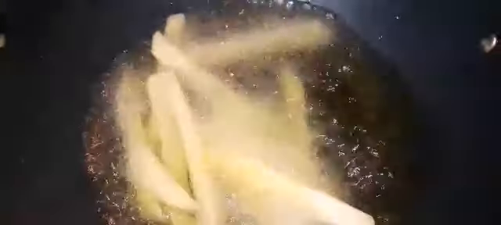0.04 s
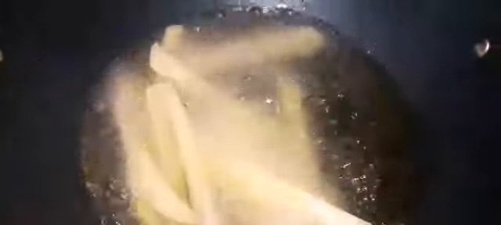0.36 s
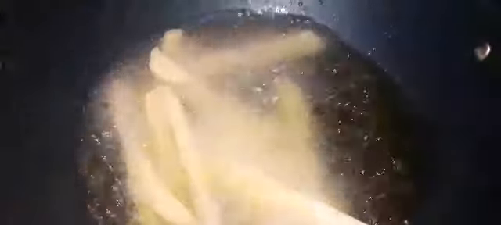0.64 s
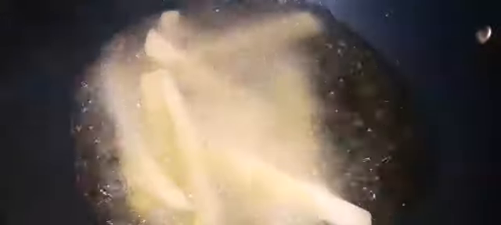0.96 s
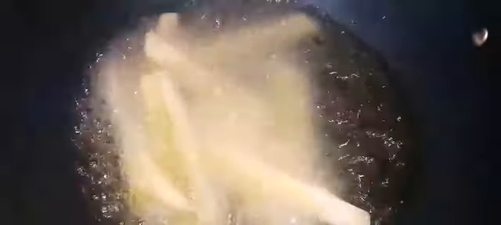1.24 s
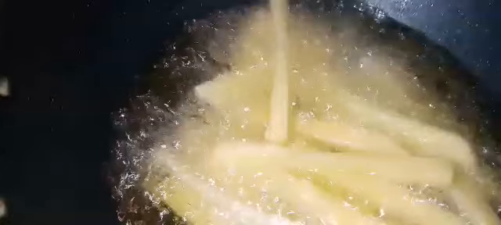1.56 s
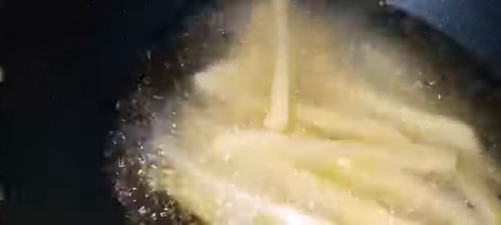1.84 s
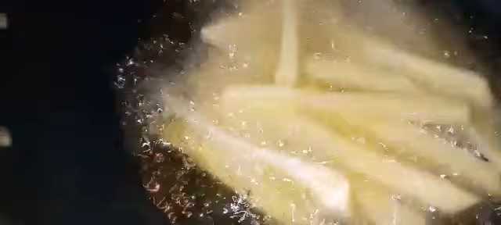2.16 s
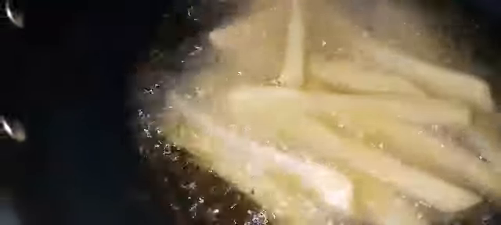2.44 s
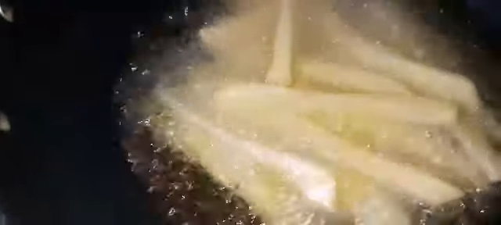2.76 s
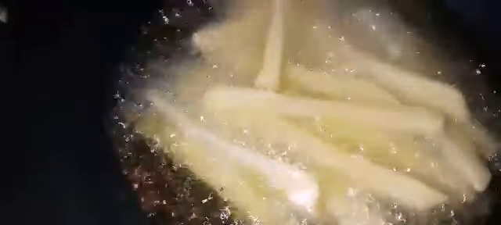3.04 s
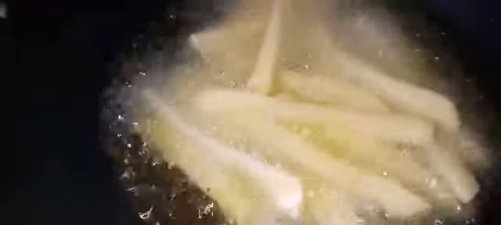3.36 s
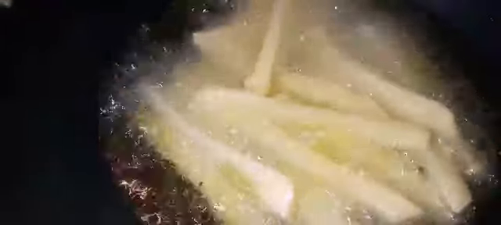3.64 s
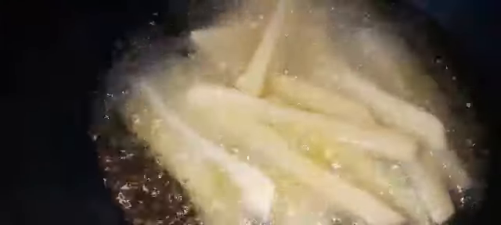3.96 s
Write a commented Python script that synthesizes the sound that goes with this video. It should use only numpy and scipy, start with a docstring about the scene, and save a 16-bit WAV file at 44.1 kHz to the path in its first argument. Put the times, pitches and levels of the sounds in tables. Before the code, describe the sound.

Potato sticks sizzle and crackle in a pan of hot oil, with small pops.

```python
"""A kitchen, close above a pan of hot oil in which potato sticks fry. Countless steam bubbles burst and ring as
damped resonators, summing to a low crackle and a high fizz. Coarsely spitting oil is heard first; at 1.28 s the
level dips briefly and the scene changes to a fine sizzle that swells and settles. Large bubbles pop, droplets
snap and the pan is knocked softly, over a faint boiling rumble and mains hum. A limiter holds the peaks."""
import sys
import numpy as np
from scipy import signal
from scipy.fft import rfft, irfft
from scipy.io import wavfile
from scipy.ndimage import uniform_filter1d, minimum_filter1d

SR = 44100
rng = np.random.default_rng(int(sys.argv[2]) if len(sys.argv) > 2 else 0)


def to_wav(s):
    """Save 16-bit WAV."""
    ch = np.atleast_2d(s).T  # columns
    pcm = np.round(np.clip(ch, -1, 1) * 32767)  # PCM
    wavfile.write(sys.argv[1], SR, pcm.astype(np.int16))


N = 176400


# Course of the spitting: time_s, crackle_db, fizz_db
SPITTING_LEVELS = [(0, -26.5, -20), (.06, -24.5, -20), (.4, -26.5, -22), (.6, -28, -22), (.67, -29, -26),
                   (.78, -29, -22), (.98, -27.5, -22), (1.03, -30.5, -27.5), (1.1, -32, -24.5),
                   (1.28, -35.5, -28.5)]
# Spectral envelopes of its two bands: frequency_hz, gain_db
COARSE_CRACKLE_SPECTRUM = [(76, -42), (200, -15), (502, -14.5), (610, -8), (771, -10.5), (1250, -3.5),
                           (1640, -7), (2240, -0.5), (2900, -12), (3770, -23), (6380, -120)]
COARSE_FIZZ_SPECTRUM = [(1590, -37), (2700, -2), (3010, -10.5), (3300, 1), (4180, -2), (4620, 0),
                        (6070, -13.5), (7480, -22), (8040, -21.5), (9080, -22.5), (10900, -24.5),
                        (12800, -26.5), (15000, -65)]

def spitting():
    """Shot noise: wet potato in hot oil sheds fewer, larger bubbles, whose uneven bursts sound coarse."""
    crackle = swarm(153, 3160, per_s=4200, spread_db=2.5, cycles=6.1, pitches=36)
    fizz = swarm(2210, 14700, per_s=15000, spread_db=2.0, cycles=12.7, pitches=56)
    crackle, fizz = colour(crackle, COARSE_CRACKLE_SPECTRUM), colour(fizz, COARSE_FIZZ_SPECTRUM)
    return frying(SPITTING_LEVELS, crackle, fizz, surge_db=1.3, surge_per_s=70)


# Course of the sizzle: time_s, crackle_db, fizz_db
SIZZLING_LEVELS = [(1.29, -37, -25.5), (1.4, -38, -21), (1.62, -36, -23), (1.8, -36, -21),
                   (1.88, -33, -19.5), (2.25, -33, -20.5), (2.55, -32.5, -22), (2.75, -33, -25.5),
                   (3.0, -35.5, -27.5), (3.55, -34, -29), (4.0, -35.5, -31)]
# Spectral envelopes of its two bands: frequency_hz, gain_db
FINE_CRACKLE_SPECTRUM = [(76, -32.5), (130, -14), (178, -22), (529, -10.5), (1030, -9), (1530, -6),
                         (2650, -2), (2900, 0), (3770, -16), (6380, -120)]
FINE_FIZZ_SPECTRUM = [(1590, -42), (2700, -8.5), (3250, -0.5), (5260, -3), (7220, -17.5), (8040, -24.5),
                      (8510, -21.5), (9140, -21.5), (10300, -19), (11500, -21.5), (12800, -30),
                      (13800, -76), (15000, -72)]

def sizzling():
    """Dense shot noise: the tiny bubbles of foaming oil overlap into a smoother hiss."""
    crackle = swarm(137, 3090, per_s=6000, spread_db=2.0, cycles=3.3, pitches=36)
    fizz = swarm(2404, 14260, per_s=30000, spread_db=1.0, cycles=13, pitches=56)
    crackle, fizz = colour(crackle, FINE_CRACKLE_SPECTRUM), colour(fizz, FINE_FIZZ_SPECTRUM)
    return frying(SIZZLING_LEVELS, crackle, fizz, surge_db=0.54, surge_per_s=60)


def bubble(hz, t60_s, rise_s=0.00024, glide_per_s=2.9):
    """Damped resonance: a bubble rings briefly, its pitch rising as it opens."""
    t = seconds(.05)
    phase = 2 * np.pi * hz * t * (1 + glide_per_s * t / 2)
    return np.sin(phase) * undb(-60 * t / t60_s) * (1 - np.exp(-t / rise_s))


def swarm(lo_hz, hi_hz, per_s, spread_db, cycles, pitches):
    """Superposition: bubbles burst at random with power-law strengths, many weak and a few strong."""
    out, bursts_per_pitch = np.zeros(N), int(per_s * N / SR / pitches) + 1
    for hz in np.linspace(lo_hz, hi_hz, pitches):
        pitch_rng = np.random.default_rng(rng.integers(1 << 30))
        when, chance, sign = pitch_rng.random((bursts_per_pitch, 3)).T
        strengths = undb(spread_db * -np.log(np.maximum(chance, .004)))
        bursts = np.bincount((when * N).astype(int), strengths * np.sign(sign - .5), N)
        ring = unit_rms(bubble(hz, t60_s=min(cycles / hz, .02))[:1024])
        out += signal.oaconvolve(bursts, ring)[:N]
    return unit_rms(out)


def frying(levels, crackle, fizz, surge_db, surge_per_s):
    """Amplitude modulation: crackle and fizz surge together as steam escapes; louder fizz is brighter."""
    t = np.arange(N) / SR
    time_s, crackle_db, fizz_db = np.array(levels).T
    surge = undb(surge_db * wander(surge_per_s))
    crackle = unit_rms(butterworth(pan_modes(crackle), hz=2674, kind="low", order=14))
    fizz = unit_rms(butterworth(pan_modes(fizz), hz=2928, kind="high", order=16))
    fizz_course_db = np.interp(t, time_s, fizz_db)
    top_hiss = fizz - below(fizz, hz=8100)
    brightening_db = 0.17 * (fizz_course_db - fizz_db.mean())
    fizz = fizz + top_hiss * (undb(brightening_db) - 1)
    return (crackle * undb(np.interp(t, time_s, crackle_db)) + fizz * undb(fizz_course_db)) * surge


# Resonances of the pan: frequency_hz, bandwidth_hz, gain_db
PAN_MODES = [(420, 6.1, -1), (625, 36, -16.5), (1284, 53, -11), (1570, 37, -10), (3280, 130, -21)]

def pan_modes(x):
    """Forced resonance: the pan adds a narrow band of the frying at each of its modes."""
    return x + sum(undb(db) * signal.lfilter(*signal.iirpeak(hz, hz / width_hz, SR), x)
                   for hz, width_hz, db in PAN_MODES)


# Courses of the bass and of the hollow between crackle and fizz: time_s, gain_db
BASS_GAINS = [(1.28, -10), (1.33, -20), (1.75, -13), (1.95, 0), (2.5, -1), (3.5, 0)]
HOLLOW_GAINS = [(.4, 4.5), (1.0, 4), (1.5, -0.5), (2.2, 3.5), (2.8, -1.5), (3.2, -1.5), (4.0, -4)]

def shifting_timbre(oil):
    """Time-varying filtering: the bass is thin until about 2 s; the hollow deepens as the oil settles."""
    oil = ride(oil, below(oil, hz=453), BASS_GAINS)
    hollow_band = signal.butter(2, (2520, 3070), "band", fs=SR, output="sos")
    return ride(oil, signal.sosfiltfilt(hollow_band, oil), HOLLOW_GAINS)


# Large bubbles: start_s, pitch_hz, level_db, t60_s
LARGE_BUBBLES = [(0.0203, 4210, -13, .007), (0.037, 3600, -5, 0.0056), (0.046, 3050, -12, 0.0041),
                 (0.0914, 4330, -10, 0.0063), (0.1148, 2230, -8, .006), (.1498, 3740, -7, 0.0077),
                 (0.1903, 880, -11, 0.01), (0.1968, 2800, -3.5, 0.0044), (.242, 4440, -7, 0.0079),
                 (.271, 1780, -7.5, 0.01), (.2998, 4730, -6.5, .006), (.3104, 2250, 1.5, 0.0063),
                 (0.3682, 2880, -7.5, .005), (0.387, 1360, -11.5, 0.013), (.3893, 5600, -7.5, 0.0071),
                 (0.4063, 4040, -5, .006), (.42, 2460, -5, .007), (.427, 2370, -7, 0.0064),
                 (.4655, 5100, -6, 0.0062), (0.5375, 3380, -7, 0.0071), (0.5427, 2170, -8.5, 0.008),
                 (.595, 2690, -7, 0.0043), (.6114, 3520, -8.5, 0.0079), (.635, 466, -21, 0.036),
                 (0.675, 3130, -7.5, 0.0067), (0.752, 3410, -6.5, .008), (0.815, 4600, -5, 0.0088),
                 (0.8496, 3310, -4, 0.013), (0.963, 2370, -7, 0.0066), (0.9743, 4600, -11, .007),
                 (1.0464, 3350, -9, 0.0074), (1.0528, 3330, 1.5, 0.0069), (1.0947, 4490, -6, .0035),
                 (1.1394, 3250, -4.5, 0.0065), (1.1613, 5700, -10.5, 0.0031), (1.1864, 2270, -8.5, 0.017),
                 (1.241, 3200, -5.5, 0.013), (1.2677, 4360, -8.5, .007), (1.403, 3170, -7.5, 0.011),
                 (1.4656, 3500, -6, 0.0041), (1.4944, 3200, -8, .004), (1.7491, 3530, -9.5, .004),
                 (1.8584, 3750, -9, 0.0026), (2.245, 1500, -13, 0.0029), (2.327, 2400, -14, .006),
                 (2.7116, 3870, -17, .005), (2.9105, 2460, -15, 0.0039), (3.1254, 3590, -2, 0.0033)]

def pops(gain_db=-1, click_db=-29, spray_db=-15, spray_decay_s=0.0015):
    """Impulse excitation: a large bubble breaks with a click and a short splash, then rings freely."""
    out = np.zeros(N)
    for start_s, pitch_hz, level_db, t60_s in LARGE_BUBBLES:
        ring = unit_peak(bubble(pitch_hz, t60_s))
        t = np.arange(len(ring)) / SR
        spray = noise(len(t), BURST_SPECTRUM) * np.exp(-t / spray_decay_s)
        pop = ring + undb(click_db) * click(len(t)) + undb(spray_db) * spray
        add(out, start_s, undb(level_db + gain_db) * pop)
    return out


# Spectral envelope of a bursting film and its spray: frequency_hz, gain_db
BURST_SPECTRUM = [(100, -24), (700, -4.5), (2000, -3.5), (3600, 2), (5200, -9), (7000, -17.5), (11000, -21),
                  (15000, -55)]

def click(length):
    """Pressure impulse: a film bursts so quickly that its spectrum is broad."""
    return unit_peak(colour(signal.unit_impulse(length), BURST_SPECTRUM))


# Bursting droplets: start_s, click_db, tick_db
DROPLETS = [(.283, -13, -23), (0.5096, -1, -13.5), (0.5219, -1, -36), (0.63, -0.5, -45), (0.6492, 2.5, -27),
            (0.7105, -4.5, -34), (1.2069, -9, -26), (2.6875, -7.5, -40)]

def snaps(tick_decay_s=0.00054):
    """Flash boiling: a water droplet expands into steam with a broad click and a thin tick."""
    out, t = np.zeros(N), seconds(.02)
    for start_s, click_db, tick_db in DROPLETS:
        burst = rng.standard_normal(len(t)) * np.exp(-t / tick_decay_s)
        tick = unit_peak(butterworth(burst, hz=(9000, 13000), kind="band", order=3))
        add(out, start_s, undb(click_db) * click(len(t)) + undb(tick_db) * tick)
    return out


# Soft knocks on the pan: start_s, pitch_hz, thud_db, clack_db
PAN_KNOCKS = [(0.028, 178, -34, -37), (.189, 238, -49, -17), (0.512, 242, -41, -31), (.629, 219, -28, -21),
              (0.674, 180, -29.5, -30), (0.997, 122, -34, -32), (1.258, 69.4, -35, -57),
              (2.644, 120, -33, -33), (2.685, 220, -33.5, -26.5), (2.896, 190, -40.5, -50),
              (3.984, 190, -35, -39)]
# Spectral envelope of the thud: pitch_ratio, gain_db
THUD_SPECTRUM = [(.25, -23), (.65, -5), (1, -6), (1.5, -3.5), (3, -24), (16, -86)]
# Spectral envelope of the clack: frequency_hz, gain_db
CLACK_SPECTRUM = [(150, -29), (400, 6.5), (1200, 1), (2000, -17), (3000, -38), (9000, -81)]

def knocks(rise_s=0.00075, thud_decay_s=0.015, clack_decay_s=.0055):
    """Heavily damped impact: the pan answers with broad noise bands, a low thud and a shorter clack."""
    out, t = np.zeros(N), seconds(0.03)
    attack = 1 - np.exp(-t / rise_s)
    for start_s, pitch_hz, thud_db, clack_db in PAN_KNOCKS:
        thud = noise(len(t), np.array(THUD_SPECTRUM) * (pitch_hz, 1)) * np.exp(-t / thud_decay_s)
        clack = noise(len(t), CLACK_SPECTRUM) * np.exp(-t / clack_decay_s)
        add(out, start_s, (undb(thud_db) * thud + undb(clack_db) * clack) * attack)
    return out


def reflections(x, level_db=-9.5, t60_s=0.11):
    """Reverberation: echoes from pan wall and kitchen merge into an exponentially decaying tail."""
    t = seconds(.3)
    tail = rng.standard_normal(len(t)) * undb(-60 * t / t60_s)
    return undb(level_db) * signal.fftconvolve(x, tail / np.linalg.norm(tail))[:N]


# Spectral envelope of the boiling oil: frequency_hz, gain_db
BOILING_SPECTRUM = [(20, -37), (50, -6), (90, 3), (130, 2), (200, -9), (500, -2.5), (2000, -77)]

def boiling_rumble(level_db):
    """Random pressure fluctuation: boiling oil radiates low-frequency noise."""
    return undb(level_db) * noise(N, BOILING_SPECTRUM)


def mains_hum(pitch_hz=100.5, rms_db=-57.5, waver=.42):
    """Amplitude-modulated tone: the mains hums at one pitch while its level wavers."""
    amplitude = np.sqrt(2) * undb(rms_db) * (1 + waver * wander(per_s=11))
    return amplitude * np.sin(2 * np.pi * pitch_hz * np.arange(N) / SR)


def colour(x, spectrum, size=4096):
    """Minimum-phase filtering: a folded cepstrum makes the (frequency_hz, gain_db) response causal."""
    hz, db = np.array(spectrum, float).T
    bins_hz = np.maximum(np.fft.rfftfreq(size, 1 / SR), 1)
    magnitude = undb(np.interp(np.log(bins_hz), np.log(hz), db))
    cepstrum = irfft(np.log(magnitude))
    cepstrum[1:size // 2] *= 2
    cepstrum[size // 2 + 1:] = 0
    return signal.fftconvolve(x, irfft(np.exp(rfft(cepstrum))))[:len(x)]


def noise(length, spectrum):
    """Spectral shaping of white noise, at rms 1."""
    return unit_rms(colour(rng.standard_normal(length), spectrum))


def butterworth(x, hz, kind, order):
    """Causal filtering with a maximally flat passband."""
    return signal.sosfilt(signal.butter(order, hz, kind, fs=SR, output="sos"), x)


def below(x, hz):
    """Zero-phase low-pass filtering."""
    return signal.sosfiltfilt(signal.butter(6, hz, fs=SR, output="sos"), x)


def ride(x, band, gains):
    """Band gain: one part of x follows its own (time_s, gain_db) curve."""
    gain_db = np.interp(np.arange(N) / SR, *np.array(gains).T)
    return x + band * (undb(gain_db) - 1)


def wander(per_s):
    """Random modulation with a spread near 1 and per_s new values a second."""
    return np.interp(np.arange(N) / SR * per_s, np.arange(1000), rng.standard_normal(1000))


def add(out, start_s, x):
    """Superpose a sound at its start time."""
    i = max(int(start_s * SR), 0)
    part = x[:max(N - i, 0)]
    out[i:i + len(part)] += part


def seconds(length_s):
    """Time axis of a short sound."""
    return np.arange(int(length_s * SR)) / SR


def undb(db):
    """Decibels to amplitude ratio."""
    return 10 ** (np.asarray(db) / 20)


def unit_rms(x):
    """Normalise to rms 1."""
    return x / np.sqrt(np.mean(x ** 2))


def unit_peak(x):
    """Normalise to peak 1."""
    return x / abs(x).max()


def scene(dip_start_s=1.2805, dip_end_s=1.291, dip_db=-17.0):
    """Superposition, alike in both ears: the scene changes from spitting to sizzling at a brief dip in level."""
    t = np.arange(N) / SR
    before_dip, after_dip = t < dip_start_s, t > dip_end_s
    background = boiling_rumble(level_db=np.where(before_dip, -50, -61)) + mains_hum()
    oil = shifting_timbre(np.where(before_dip, spitting(), sizzling()))
    pops_and_knocks = pops() + knocks()
    mono = oil + snaps() + pops_and_knocks + reflections(pops_and_knocks) + background
    return np.array([mono, mono]) * np.where(before_dip | after_dip, 1, undb(dip_db))


def record(dry, notch_hz=8055, notch_width_hz=990, ceiling_db=-1, limiter_s=.009, top_hz=15500):
    """Filtering and limiting: the microphone notches the treble, peaks are ducked, the top is cut."""
    notch = signal.iirnotch(notch_hz, notch_hz / notch_width_hz, SR)
    x = signal.lfilter(*notch, signal.lfilter(*notch, dry))
    span = int(limiter_s * SR)
    gain = np.minimum(1, undb(ceiling_db) / (abs(x).max(axis=0) + 1e-9))
    x = x * uniform_filter1d(minimum_filter1d(gain, 2 * span), span)  # held, then smoothed
    return signal.sosfilt(signal.ellip(8, .2, 80, top_hz, fs=SR, output="sos"), x)


dry = scene()
out = record(dry)
to_wav(out)
```